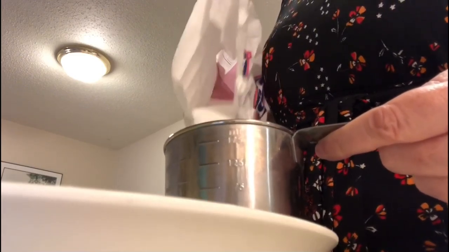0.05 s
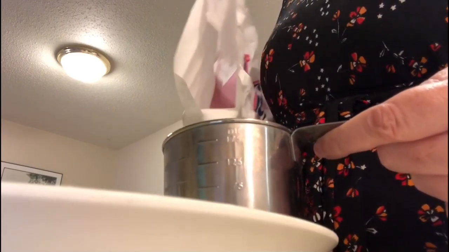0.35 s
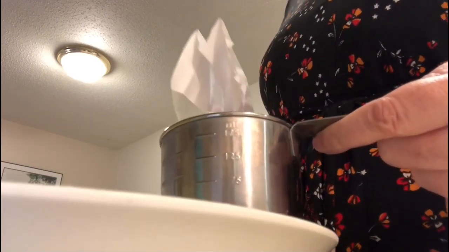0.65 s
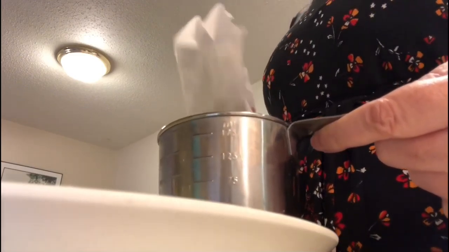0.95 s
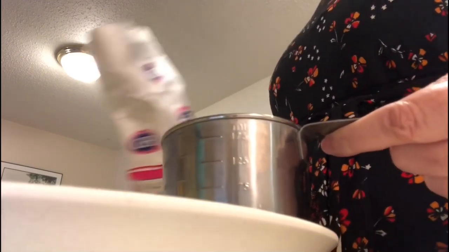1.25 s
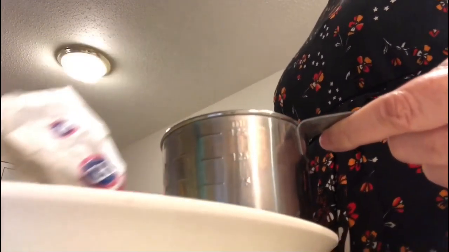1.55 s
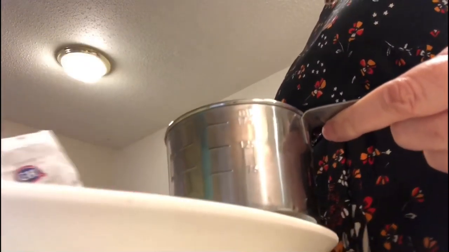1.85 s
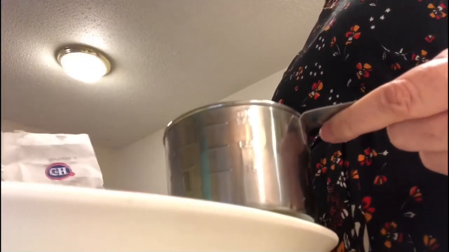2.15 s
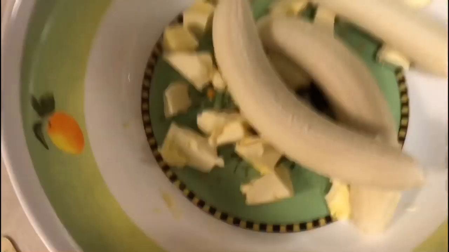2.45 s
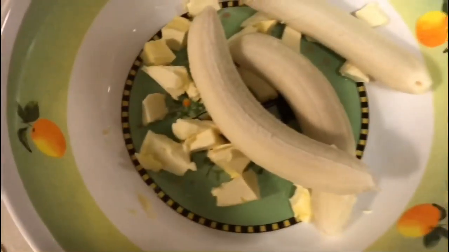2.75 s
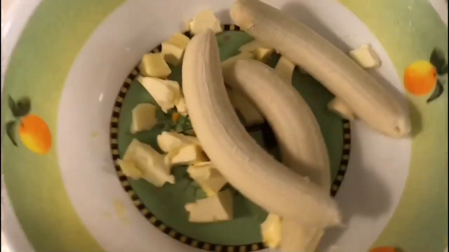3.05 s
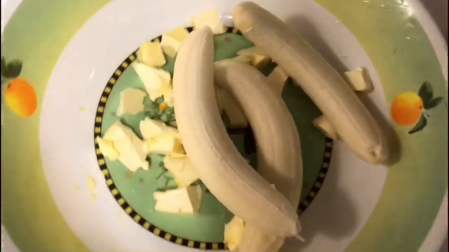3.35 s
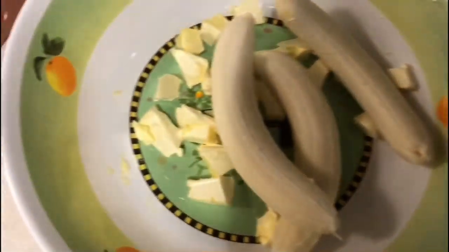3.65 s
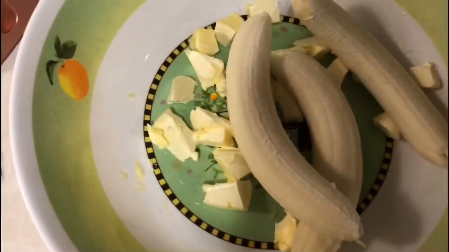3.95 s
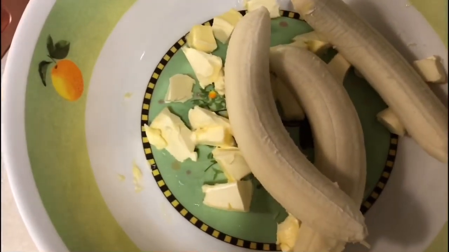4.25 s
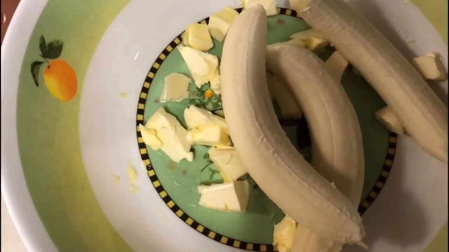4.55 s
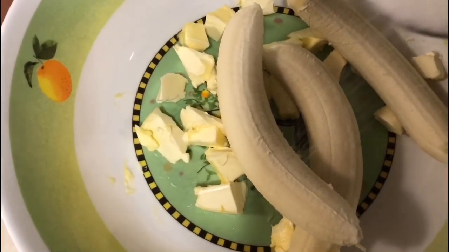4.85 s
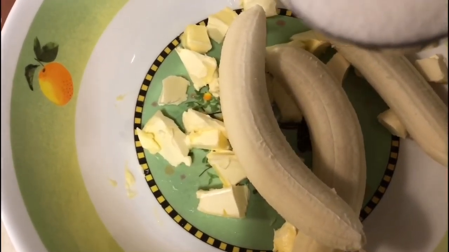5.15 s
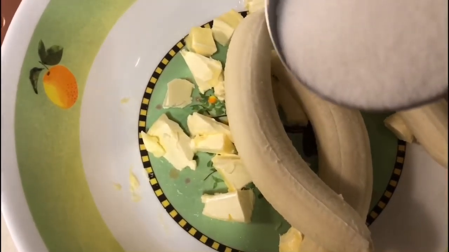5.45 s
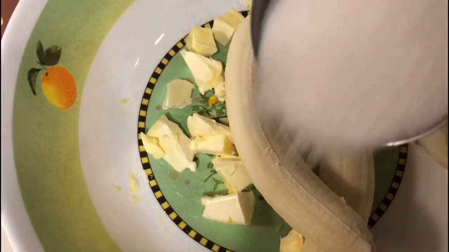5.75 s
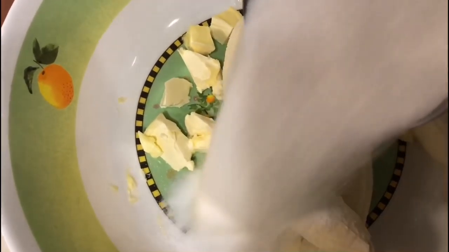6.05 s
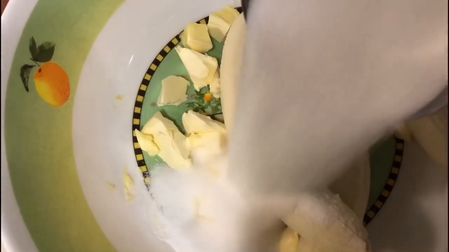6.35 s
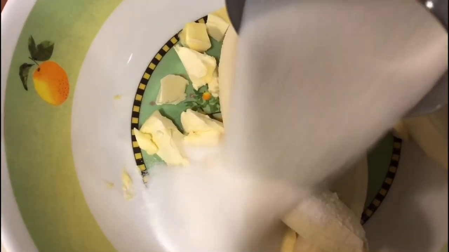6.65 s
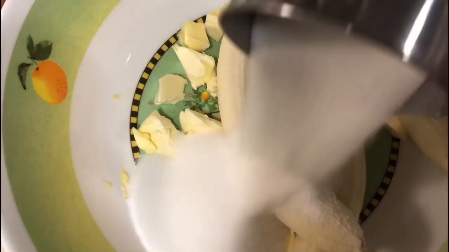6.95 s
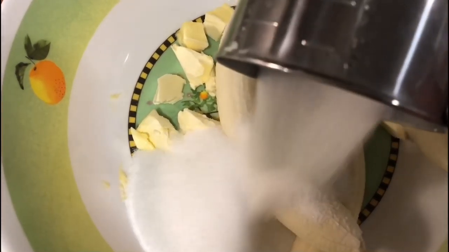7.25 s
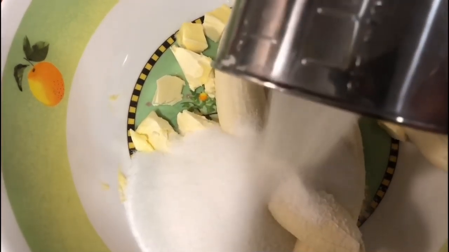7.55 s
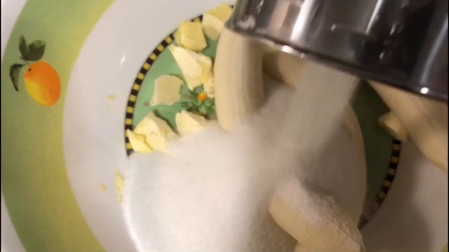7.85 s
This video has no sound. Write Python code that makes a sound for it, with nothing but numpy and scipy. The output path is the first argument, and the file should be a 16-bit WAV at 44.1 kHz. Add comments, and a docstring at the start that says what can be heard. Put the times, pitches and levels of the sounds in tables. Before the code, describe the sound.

Close to the microphone in a small kitchen, the last sugar hisses softly from a paper bag for half a second. The bag crackles and pops until about 1.8 seconds, dragging briefly and bumping a steel measuring cup three times between 1 and 1.3 seconds. From 1.9 to 2.6 seconds the microphone is picked up, with skin rubbing, low thumps and sharp knocks, loudest near 2 seconds. The full cup scrapes and clinks brightly at 3.1 seconds, then more softly at 3.7. From 4.5 to 5.2 seconds a thin dribble of sugar patters into a mixing bowl with small ticking lumps. The main pour starts around 5.7 seconds, lands with a soft slap and thud, and continues as a dense hiss, turning slightly metallic from 7 seconds as it thins. At 7.7 seconds the nearly empty cup is knocked once and rings briefly. Faint low room noise lies underneath.

```python
"""Sugar pours from a steel measuring cup into a mixing bowl: a dribble, then a hiss of countless impacts.
Sliding grains drive the resonances of the emptying cup, which is knocked once at the end.
Before the pour, the last sugar runs into the cup from a paper bag that crackles and pops as it buckles;
the microphone is picked up with a rub and a few knocks, and the full cup clinks in its modes.
A small kitchen adds diffuse reflections and a faint steady noise."""
import sys
import numpy as np
from scipy import signal
from scipy.fft import rfft, irfft
from scipy.io import wavfile

SR = 44100
rng = np.random.default_rng(int(sys.argv[2]) if len(sys.argv) > 2 else 0)


def unload_wav(signal):
    """Save mono or channel-first audio to the path in sys.argv[1] as 16-bit WAV at rate SR, clipped to [-1, 1]."""
    wavfile.write(
        sys.argv[1],
        SR,
        np.round(np.clip(np.atleast_2d(signal).T, -1, 1) * 32767).astype(np.int16),
    )


N = 348390
TIME = np.arange(N) / SR

# resonances of the mixing bowl: (frequency [Hz], bandwidth [Hz], level [dB])
BOWL_MODES = [(2050, 160, -7.5), (2520, 110, -.5), (2860, 130, 0), (3170, 70, 1.5), (3290, 90, .5),
              (3600, 150, -7), (4350, 250, -9)]


def sugar_pour():
    """Superposed impacts: a dense stream of grains hisses, drums on the bowl and slides over the cup."""
    # flow over the rim: (time [s], level [dB])
    rim_flow = [(5.56, -94.5), (5.68, -75.5), (5.715, -63), (5.9, -57), (6.3, -62.5), (6.57, -57.5),
                (7.15, -66), (7.9, -70.5)]
    # last grains, shaken loose by the knock: (time [s], level [dB], rise [s], fall [s])
    shaken_loose = [(7.8, -61, 0.2, 0.8)]
    # bouncing grains: (frequency [Hz], spectral level [dB])
    spray_spectrum = [(1500, -22), (3500, -4.5), (5300, -1), (8000, -1.5), (11000, -1), (16000, 1.5)]
    # grains landing on the heap: (frequency [Hz], spectral level [dB])
    heap_spectrum = [(200, -1.5), (600, 1.5), (1100, 3.5), (1550, -2.5), (2100, 0), (3200, -4),
                     (4300, -11.5), (8000, -5)]
    # sliding, louder as steel is uncovered: (start [s], end [s], initial level [dB], rise [s], fall [s])
    slide_stroke = (6.88, 7.54, -64.5, .42, .6)
    flow = level(rim_flow) + swells(shaken_loose)
    slide = stroke(*slide_stroke, slope_db_per_s=17.5)
    bouncing = flow * bare_bowl(boost_db=16, muffle_s=.051)
    spray_gain = np.hypot(from_db(-.5) * bouncing, from_db(-3.5) * slide)
    spray = spray_gain * coloured(grains(22000, 3.9) * flutter(90, 1), spray_spectrum)
    heap = from_db(-3) * coloured(grains(9000, 4.3), heap_spectrum)
    bowl = from_db(-4) * resonate(grains(9000, 3.3), BOWL_MODES)
    drumming = flow * bare_bowl(boost_db=7, muffle_s=.092) * (heap + bowl)
    return spray + drumming + cup_wall(slide)


def bare_bowl(boost_db, muffle_s, covered_s=5.83):
    """Cushioning: the extra gain of impacts on the bare bowl dies away once a heap covers it."""
    return from_db(boost_db * np.exp(-np.maximum(TIME - covered_s, 0) / muffle_s))


def cup_wall(slide):
    """Forced vibration: sliding grains drive the wall, whose lower modes are freed as the sugar leaves."""
    # upper wall resonances: (frequency [Hz], bandwidth [Hz], level [dB])
    upper_modes = [(6890, 80, 0), (7020, 80, -2), (8250, 65, 4), (8400, 80, -3), (10130, 180, -7),
                   (11580, 70, 1), (11830, 60, 2), (12200, 60, -2), (12350, 70, -2), (13000, 90, -8),
                   (15050, 140, -6), (15650, 120, -3.5)]
    # lower wall resonances: (frequency [Hz], bandwidth [Hz], level [dB])
    lower_modes = [(2120, 20, -2), (3800, 18, 1), (4730, 30, 0), (4810, 25, 2), (5850, 18, -1)]
    force = grains(15000, 4.3) * flutter(14, 1)
    uncovered = np.interp(TIME, [7.15, 7.4], [0, 1])
    lower_ring = uncovered * from_db(-11.5) * resonate(force, lower_modes)
    rim_free = np.interp(TIME, [6.6, 6.85], [0, 1])
    rim_hum = rim_free * from_db(-70.5) * resonate(force, [(1110, 28, 0)])
    return slide * (resonate(force, upper_modes) + lower_ring) + rim_hum


def sugar_dribble():
    """Intermittent granular flow: a thin stream excites the bowl and breaks into spurts as it dwindles."""
    # the trickle: (start [s], end [s], initial level [dB], rise [s], fall [s])
    trickle_stroke = (4.548, 4.98, -57, .04, .75)
    # its impacts: (frequency [Hz], spectral level [dB])
    impact_spectrum = [(700, -8), (1600, -8), (2300, -8.5), (3200, -5), (6000, -0.5), (10000, -2.5),
                       (16000, -0.5)]
    impacts = coloured(grains(9000, 3.9), impact_spectrum)
    bowl = from_db(-8) * resonate(grains(3500, 5.2), BOWL_MODES)
    shut_off = stroke(0, 5.19, 0, rise_s=1, fall_s=.13)
    flow = stroke(*trickle_stroke, slope_db_per_s=-7) * shut_off
    clumping_db = np.interp(TIME, [4.8, 5.15], [1.3, 3.2])
    return flow * (impacts + bowl) * flutter(170, clumping_db)


def sugar_lumps():
    """Inelastic impact: small lumps tick and crumble, and the bulk lands with a slap and a thud."""
    # lumps: (time [s], level [dB], centre [Hz], width [octaves])
    lumps = [(4.563, -56, 6500, 3.2), (4.866, -56, 6530, 2.5), (4.957, -46, 6500, 2.2),
             (5.059, -60.5, 3310, .6), (5.12, -59, 6430, 2.4), (6.258, -51.5, 1980, 0.27)]
    # the bulk lands: (time [s], level [dB])
    landing = [(5.817, -36)]
    # slap and thud: (centre [Hz], width [octaves], gain [dB], chatter t60 [s], chatter [dB])
    landing_bands = [(182, 0.55, -7.5, 0.51, 3.5), (720, 1.24, 1, 0.031, 5), (2330, 0.89, 3, 0.069, 7)]
    crumble_t60_s, crumble_db = .022, 0
    lump_hits = [(*row, crumble_t60_s, crumble_db) for row in lumps]
    return blows(lump_hits + through(landing, landing_bands), leak_db=-10)


def steel_cup():
    """Modal vibration: the cup scrapes and clinks when full, and rings lower once nearly empty."""
    # the cup slips in the hand: (time [s], level [dB], rise [s], fall [s])
    slips = [(3.06, -59, 0.16, 0.47), (3.4, -74.5, .4, 0.092), (3.64, -69, 0.22, 0.57)]
    # touches: (time [s], level [dB], contact cut-off [Hz], chatter t60 [s], free ring [dB], crack [dB])
    touches = [(3.127, -36, 11000, .016, -8, -13), (3.1435, -28.5, 9500, .015, -1.5, -19),
               (3.383, -58, 8000, .02, 0, -10), (3.653, -43.5, 13000, .012, -8, -6),
               (3.710, -56, 4000, .015, -5, -12), (3.816, -61, 6000, .015, -3, -12)]
    # a knock and its rebound: columns as in touches
    knock = [(7.7445, -34.5, 15300, 0.012, 8, -3.5), (7.7558, -33.5, 2200, 0.044, -18, -10.5)]
    # the full cup: (frequency [Hz], level [dB], t60 [s])
    full_modes = [(1280, -11, .1), (1338, -4.5, .2), (1700, -6, .08), (1888, -4, .15), (1952, -3, .1),
                  (2019, 0, .22), (2104, -1, .14), (3025, -13.5, .24), (3400, -24, .08), (4383, -15, .24),
                  (4750, -19, .08), (5254, -16, .14), (5825, -20, .15), (6520, -10, .07), (6725, -7.5, .13),
                  (7784, -10, .09), (8010, -9, .06), (8295, -9, .13), (10700, -20, .06)]
    # the nearly empty cup: (frequency [Hz], level [dB], t60 [s])
    empty_modes = [(866, -7, .22), (1108, -5, .2), (1268, -4, .2), (1504, -6, .1), (1933, -5, .08),
                   (2056, -3, .2), (2115, -2, .12), (4426, -10, .2), (6700, -5, .04), (7101, -1, .08),
                   (7560, -1, .04), (8460, -3, .07), (9050, -6, .04)]
    # driven by friction: (frequency [Hz], bandwidth [Hz], level [dB])
    scrape_modes = [(1328, 69, 6), (1680, 50, -3), (1950, 136, -3), (4370, 83, -14), (6850, 190, -15.5)]
    scrape = swells(slips) * resonate(grains(1400, 2.5), scrape_modes)
    full = scrape + clinks(touches, full_modes, chatter_db=14, clack_t60=.03)
    empty = clinks(knock, empty_modes, chatter_db=14, clack_t60=.04)
    # the small wall radiates nothing below its first mode
    return high_pass(full, 1180, order=10) + high_pass(empty, 800, order=8)


def bag_outflow():
    """Shot noise: the impacts of the last grains leaving the bag merge into a hiss."""
    # outflow: (time [s], level [dB])
    flow = [(0.0, -51), (0.15, -63.5), (0.328, -54.5), (0.424, -68), (0.52, -68)]
    # its hiss: (frequency [Hz], spectral level [dB])
    hiss_spectrum = [(240, -14), (400, 0), (446, -10.5), (1040, -3.5), (1250, -10), (1440, -6),
                     (2470, -7.5), (4380, -5), (15000, -10), (16000, -9)]
    return level(flow) * coloured(grains(20000, 2.8), hiss_spectrum)


def bag_crackle():
    """Buckling: creases release elastic energy in snaps, and the paper rustles as it moves and settles."""
    # creases snap: (time [s], level [dB], centre [Hz], width [octaves])
    creases = [(.113, -60, 6460, 1.2), (0.526, -42.5, 4600, 1.3), (0.552, -59, 4000, 3),
               (0.647, -54, 5400, 3.1), (0.6638, -38.5, 3430, 1.92), (.813, -55, 1680, 2.9),
               (.874, -56.5, 5660, 0.84), (.929, -44.5, 4470, 0.96), (1.189, -36.5, 2170, 3.3),
               (1.535, -52, 4270, 1.8), (1.587, -56.5, 3520, 0.96), (1.735, -64, 1480, 5.6)]
    # a faint, very high click added at each snap:
    # (centre [Hz], width [octaves], gain [dB], chatter t60 [s], chatter [dB])
    high_click_band = [(14300, .4, -13.5, .012, 2.5)]
    # the bag is in the hand: (start [s], end [s], level [dB])
    held = (0.47, 1.8, -68.5)
    # paper and sleeve brush past: (time [s], level [dB], rise [s], fall [s])
    brushes = [(1.0, -67.5, .3, 1), (1.57, -62, .4, 0.13), (2.6, -72, .1, 0.56), (2.785, -64, .12, 0.15),
               (3.07, -70, .5, 0.55), (3.39, -65.5, .4, 0.14)]
    # rustling paper: (frequency [Hz], spectral level [dB])
    rustle_spectrum = [(300, 9.5), (800, 7.5), (1300, 3.5), (4000, -1), (8000, -6), (16000, -12)]
    settle_db, settle_s, crumple_t60_s, crumple_db = -22, .11, .016, 7
    settling = swells([(s, db + settle_db, .01, settle_s) for s, db, _, _ in creases])
    holding = stroke(*held, rise_s=.2, fall_s=.8)
    stirring = np.sqrt(holding ** 2 + settling ** 2 + swells(brushes) ** 2)
    rustle = stirring * coloured(grains(7000, 3) * flutter(60, 3.9), rustle_spectrum)
    snaps = [(*row, crumple_t60_s, crumple_db) for row in creases]
    high_clicks = through([row[:2] for row in creases], high_click_band)
    return rustle + blows(snaps + high_clicks, leak_db=-20.5)


def bag_body():
    """Damped transients: the bag's panels pop, it bumps the cup and it drags along an edge."""
    # panels pop: (time [s], level [dB], centre [Hz])
    panels = [(0.505, -45, 292), (.666, -45.5, 370), (.808, -41.5, 377), (.908, -51, 450),
              (1.017, -39, 453), (1.593, -53.5, 340)]
    # each pop's puff of air: (centre [Hz], width [octaves], gain [dB], chatter t60 [s], chatter [dB])
    puff_band = [(150, 1.05, -8, .1, 1.7)]
    # bumps against the cup: (time [s], thud level [dB], ring level [dB])
    bumps = [(1.0647, -33, -42), (1.218, -35, -37.5), (1.3221, -32, -24)]
    # their thud: columns as in puff_band
    thud_bands = [(119.4, 1.3, -16.5, .15, 5.5), (742, 0.9, -0.5, 0.033, -10.5),
                  (1440, 0.48, -4.5, 0.018, -1.5)]
    # ring of the sugar-damped cup: columns as in puff_band
    ring_bands = [(845, .18, 0, .02, -20), (865, .01, -23.5, .02, -20), (4210, .003, -38, .02, -20)]
    # the paper drags: (time [s], level [dB])
    drags = [(1.12, -30), (2.127, -37)]
    # its hiss and groan: columns as in puff_band
    drag_bands = [(6420, 0.83, 1, 0.074, 16.5), (376, .5, -9.5, 0.26, 11)]
    pop_octaves, crumple_t60_s, crumple_db = 1.6, .069, 5
    pops = [(*row, pop_octaves, crumple_t60_s, crumple_db) for row in panels]
    puffs = through([(s, db) for s, db, _ in panels], puff_band)
    thuds = through([(s, db) for s, db, _ in bumps], thud_bands)
    rings = through([(s, db) for s, _, db in bumps], ring_bands)
    return blows(pops + puffs + thuds + rings + through(drags, drag_bands), leak_db=-50)


def microphone_rub():
    """Friction noise: skin rubs the microphone's case, and the shifting grip rumbles through it."""
    # fingers rub: (start [s], end [s], initial level [dB], rise [s])
    rubs = [(1.877, 1.882, -46, .004), (1.895, 2.021, -53.5, 0.023), (2.11, 2.575, -43.5, 0.1)]
    # skin on the case: (frequency [Hz], spectral level [dB])
    rub_spectrum = [(59, -33), (100, -11.5), (206, -1), (255, -18), (406, -1.5), (818, -2.5), (891, -2.5),
                    (950, -0.5), (1130, -3), (1360, -1), (1800, -6), (7140, -3.5), (8460, -8.5),
                    (15000, -9), (16000, -17)]
    # the grip shifts: (start [s], end [s], level [dB])
    shifts = [(0.504, 1.334, -65), (1.887, 2.115, -52), (2.435, 2.48, -58), (2.944, 3.17, -60),
              (5.241, 5.47, -72.5), (5.862, 5.957, -65)]
    # its rumble: (frequency [Hz], spectral level [dB])
    rumble_spectrum = [(40, -17), (80, -2), (160, 1.5), (300, -3), (500, -11.5), (900, -20.5)]
    rubbing = sum(stroke(*row, fall_s=.035, slope_db_per_s=-7.5) for row in rubs)
    rub = rubbing * coloured(grains(25000, 2.2) * flutter(120, 1), rub_spectrum)
    shifting = sum(stroke(*row, rise_s=.11, fall_s=.35) for row in shifts)
    still_hand = from_db(-77)
    rumble = np.maximum(shifting, still_hand) * coloured(rng.standard_normal(N), rumble_spectrum)
    return rub + rumble


def microphone_knocks():
    """Structure-borne sound: impacts travel through the counter and the microphone's case."""
    # knocks: (time [s], level [dB], centre [Hz], width [octaves], chatter t60 [s], chatter [dB])
    knocks = [(1.874, -36.5, 580, 3, .05, 16), (1.896, -28.5, 560, 1.75, 0.015, -4.5),
              (1.9275, -32.5, 1200, 0.57, .011, -4), (1.9875, -18.5, 898, .62, 0.018, -1),
              (1.991, -29, 500, 1, .06, 9), (2.047, -40, 1820, 5.4, 0.063, 31),
              (2.075, -31, 1300, 1.9, 0.022, -2), (2.225, -41, 570, 1.3, .01, 2.5),
              (2.434, -35.5, 755, 2.3, 0.08, 1), (2.4597, -35.5, 1050, 2.3, 0.012, 5),
              (2.679, -56.5, 4480, 3.1, .04, 19)]
    # deep thumps through the counter: (time [s], level [dB], centre [Hz])
    counter_thumps = [(1.892, -25, 80.6), (1.928, -35, 85.5), (2.49, -42, 94), (5.25, -54, 85),
                      (5.431, -55.5, 129.5), (5.475, -52, 129.4)]
    thump_octaves, shudder_t60_s, shudder_db = .95, .16, -10
    thumps = [(*row, thump_octaves, shudder_t60_s, shudder_db) for row in counter_thumps]
    return blows(knocks + thumps, leak_db=-41)


def kitchen_reverb(x, t60, top_hz):
    """Reverberation: diffuse reflections arrive a few milliseconds late and decay exponentially."""
    t = TIME[:SR]
    tail = rng.standard_normal(SR) * from_db(-60 * t / t60) * (t > .004)
    tail = signal.sosfilt(signal.butter(1, top_hz, fs=SR, output="sos"), tail)
    return signal.fftconvolve(x, unit_energy(tail))[:N]


def room_tone():
    """Stationary noise: the room's faint background, strongest in the bass."""
    # background: (frequency [Hz], spectral level [dB])
    room_spectrum = [(18, -46), (30, -16), (124, -8), (210, -17), (239, -25), (355, -15.5), (415, -21),
                     (449, -26.5), (486, -23.5), (721, -25.5), (780, -24.5), (1070, -31), (1190, -29.5),
                     (1860, -35.5), (16000, -41)]
    return from_db(-68.5) * coloured(rng.standard_normal(N), room_spectrum)


def from_db(db):
    """Amplitude ratio of a level in decibels."""
    return 10 ** (np.asarray(db) / 20)


def rms_one(x):
    """Power normalisation: a steady sound at rms 1."""
    return x / np.sqrt(np.mean(x ** 2) + 1e-20)


def unit_energy(x):
    """Energy normalisation: a transient of energy 1."""
    return x / np.sqrt(np.sum(x ** 2) + 1e-20)


def level(rows):
    """Amplitude envelope through (time [s], level [dB]) points; silent outside them."""
    times, db = np.transpose(rows)
    return from_db(np.interp(TIME, times, db, left=-150, right=-150))


def stroke(start, end, db, rise_s, fall_s, slope_db_per_s=0):
    """Exponential envelope: it rises 30 dB in rise_s, holds on a slope and falls 30 dB in fall_s."""
    gain = np.zeros(N)
    heard = (TIME > start - 2 * rise_s) & (TIME < end + 2 * fall_s)
    t = TIME[heard]
    outside = np.maximum(start - t, 0) / rise_s + np.maximum(t - end, 0) / fall_s
    held_db = db + slope_db_per_s * (np.clip(t, start, end) - start)
    gain[heard] = from_db(held_db - 30 * outside)
    return gain


def swells(rows):
    """Summed envelopes of brief gestures that rise and fall without a hold."""
    return sum(stroke(s, s, db, rise_s, fall_s) for s, db, rise_s, fall_s in rows)


def flutter(per_s, depth_db):
    """Random amplitude modulation: a gain that wanders through per_s values a second."""
    knots = rng.standard_normal(N // 8)
    return from_db(depth_db * np.interp(TIME * per_s, np.arange(len(knots)), knots))


def grains(per_s, spread_db):
    """Shot noise: tiny impacts of uneven size at random moments; rms 1."""
    sizes = from_db(spread_db * np.minimum(rng.exponential(1, N), 5)) * rng.choice([-1, 1], N)
    return rms_one(sizes * (rng.random(N) < per_s / SR)) + 1e-18


def coloured(x, spectrum):
    """Spectral shaping by a smooth curve that falls 12 dB an octave beyond its ends; rms 1."""
    hz, db = np.transpose(spectrum)
    f = np.maximum(np.fft.rfftfreq(N, 1 / SR), 1)
    skirt = np.minimum(f / hz[0], 1) ** 2 * np.minimum(hz[-1] / f, 1) ** 2
    curve = from_db(np.interp(np.log(f), np.log(hz), db))
    return rms_one(irfft(rfft(x) * skirt * curve, N))


def resonate(x, resonances):
    """Forced response of parallel two-pole resonators; rms 1."""
    out = 0
    for hz, width, db in resonances:
        radius = np.exp(-np.pi * width / SR)
        feedback = [1, -2 * radius * np.cos(2 * np.pi * hz / SR), radius ** 2]
        out = out + from_db(db) * (1 - radius ** 2) / 2 * signal.lfilter([1, 0, -1], feedback, x)
    return rms_one(out)


def high_pass(x, hz, order):
    """Attenuation below hz."""
    return signal.sosfilt(signal.butter(order, hz, "high", fs=SR, output="sos"), x)


def band_pass(x, edges_hz, order):
    """Attenuation outside a band."""
    return signal.sosfilt(signal.butter(order, edges_hz, "band", fs=SR, output="sos"), x)


def contact(t60, chatter_db):
    """Contact force: a unit impulse, then a decaying burst of chatter with relative energy chatter_db."""
    t = TIME[:SR // 3]
    burst = (1 - np.exp(-20 * t / t60)) * from_db(-60 * t / t60)
    force = from_db(chatter_db) * unit_energy(rng.standard_normal(len(t)) * burst)
    force[0] += 1
    return force


def add_impact(out, s, db, sound):
    """Superposition at time s; unit energy is scaled to that of 5 ms at an rms level of db."""
    at = round(s * SR)
    out[at:at + len(sound)] += from_db(db) * np.sqrt(SR / 200) * sound[:N - at]


def through(events, bands):
    """Broadband excitation: rows for blows() in which every event sounds all the given bands."""
    return [(s, db + band_db, hz, octaves, t60, chatter_db)
            for s, db in events for hz, octaves, band_db, t60, chatter_db in bands]


def blows(rows, leak_db):
    """Source and filter: each contact sounds through one damped band, with a broad crack at leak_db."""
    out = np.zeros(N)
    for s, db, hz, octaves, t60, chatter_db in rows:
        force = contact(t60, chatter_db)
        edges_hz = np.clip([hz / 2 ** (octaves / 2), hz * 2 ** (octaves / 2)], 15, .45 * SR)
        body = unit_energy(band_pass(force, edges_hz, order=2))
        add_impact(out, s, db, body + from_db(leak_db) * unit_energy(force))
    return out


def clinks(rows, modes, chatter_db, clack_t60):
    """Impulse response of struck steel: a bright crack, a quickly damped clack, then the free modes."""
    out, t = np.zeros(N), TIME[:SR // 3]
    for s, db, cut_hz, chatter_t60, free_db, crack_db in rows:
        force = unit_energy(contact(chatter_t60, chatter_db))
        ring = 0
        for hz, mode_db, t60 in modes:
            decay = from_db(-60 * t / clack_t60) + from_db(free_db - 60 * t / t60) / 2
            softness = 1 / np.sqrt(1 + (hz / cut_hz) ** 4)
            swell = 1 - np.exp(-t * hz / 3)   # a mode builds up as the wave circles the wall
            mode = signal.fftconvolve(force, swell * decay * np.sin(2 * np.pi * hz * t))[:len(t)]
            ring = ring + from_db(mode_db) * softness * unit_energy(mode)
        crack = unit_energy(band_pass(force, [2500, 13000], order=1))
        add_impact(out, s, db, unit_energy(ring) + from_db(crack_db) * crack)
    return out


def scene():
    """Superposition of direct sound, reflections and room noise, the same in both ears."""
    paper = bag_outflow() + bag_crackle() + bag_body()
    hand = microphone_rub() + microphone_knocks()
    steel = steel_cup()
    sugar = sugar_dribble() + sugar_pour() + sugar_lumps()
    background = room_tone()
    # sharp snaps radiate all round the room; the low pops stay close
    radiated = (from_db(-19.5) * sugar + from_db(-17.5) * steel
                + from_db(-8) * high_pass(paper, 2600, order=1) + from_db(-14.5) * hand)
    mono = sugar + steel + paper + hand + kitchen_reverb(radiated, t60=.34, top_hz=7000) + background
    return np.array([mono, mono])


def record(dry):
    """Band limiting: the small microphone loses the deepest bass, and the top is cut steeply."""
    bass_hz, top_hz = 48, 15900
    thin = high_pass(dry, bass_hz, order=4)
    return signal.sosfilt(signal.ellip(12, .1, 80, top_hz, fs=SR, output="sos"), thin)


dry = scene()
out = record(dry)
unload_wav(out)
```